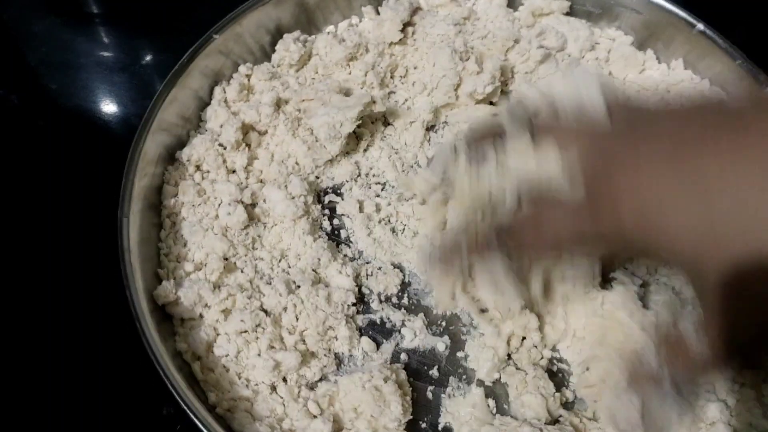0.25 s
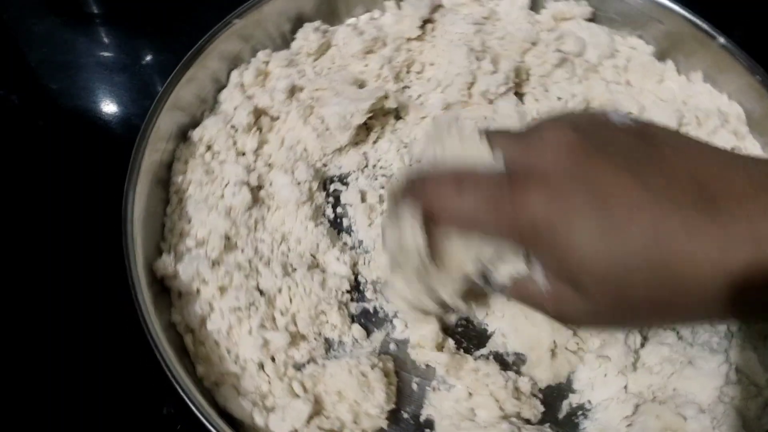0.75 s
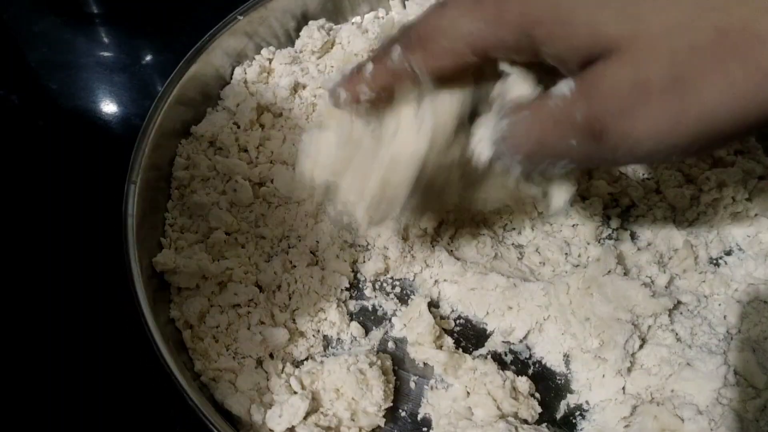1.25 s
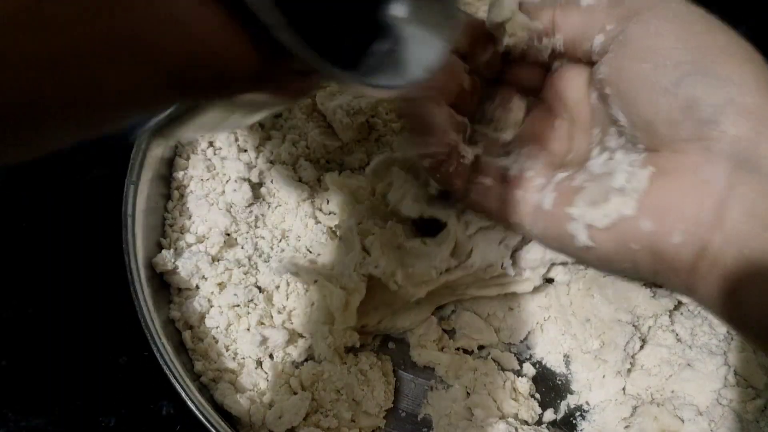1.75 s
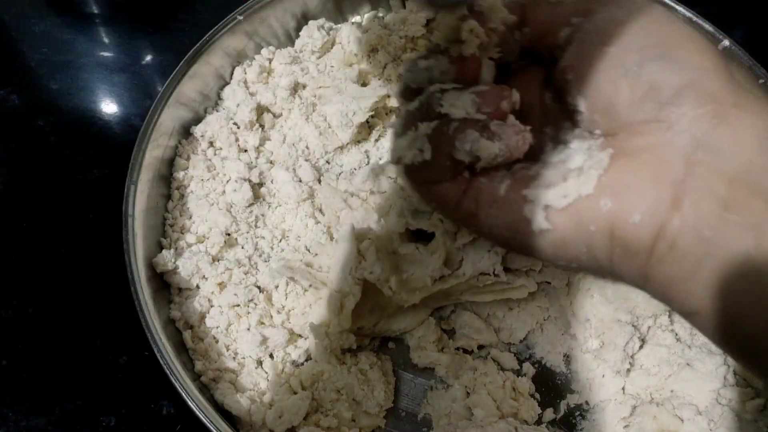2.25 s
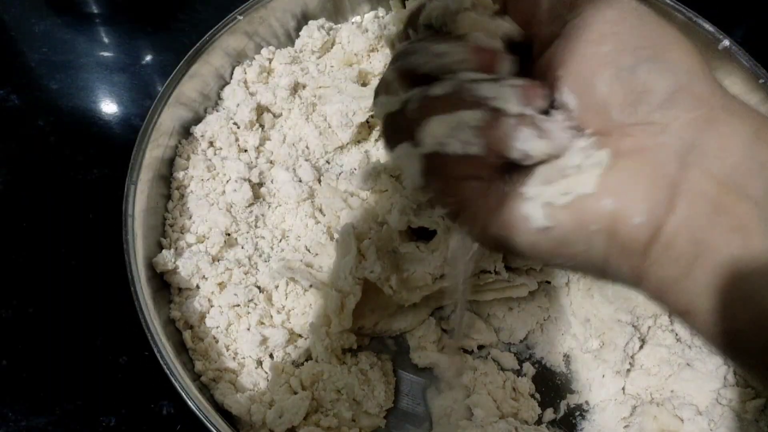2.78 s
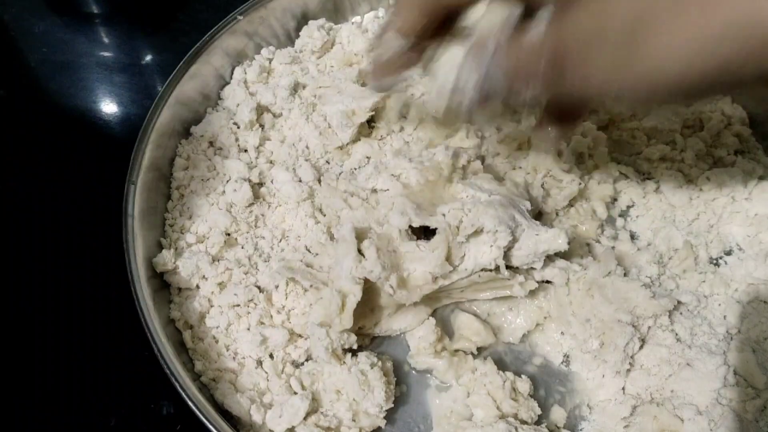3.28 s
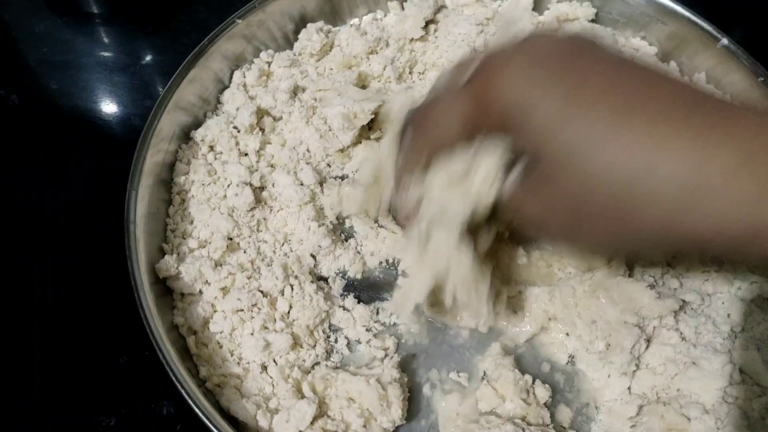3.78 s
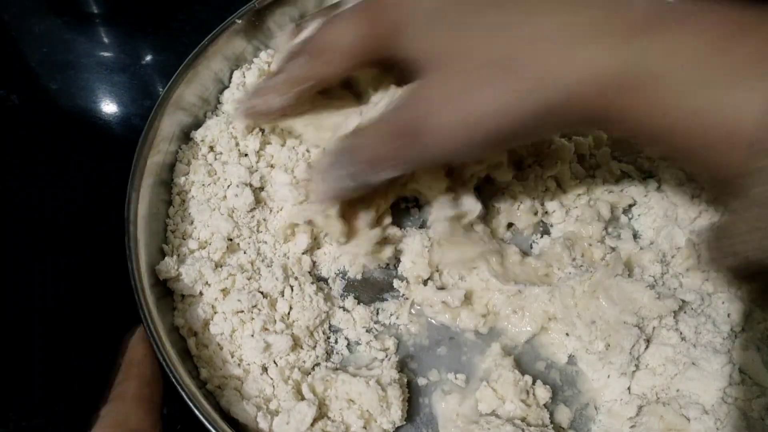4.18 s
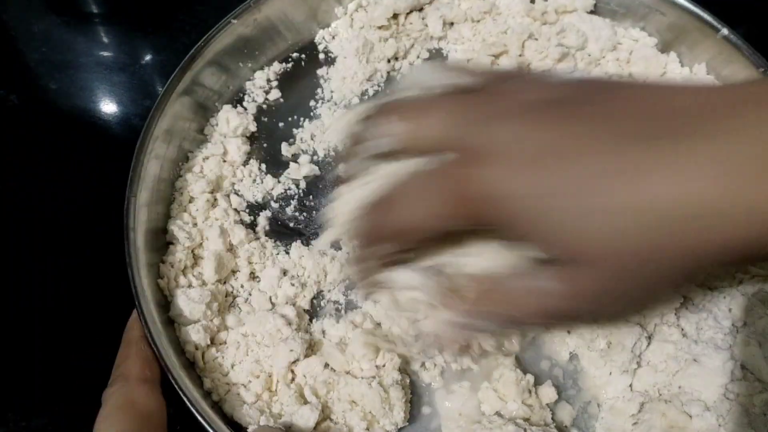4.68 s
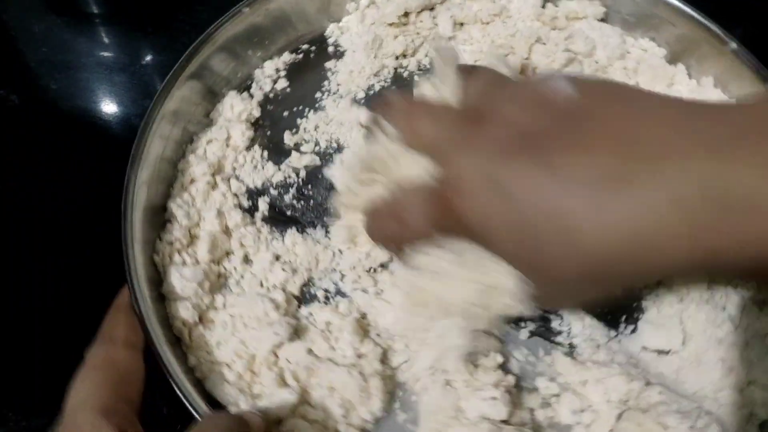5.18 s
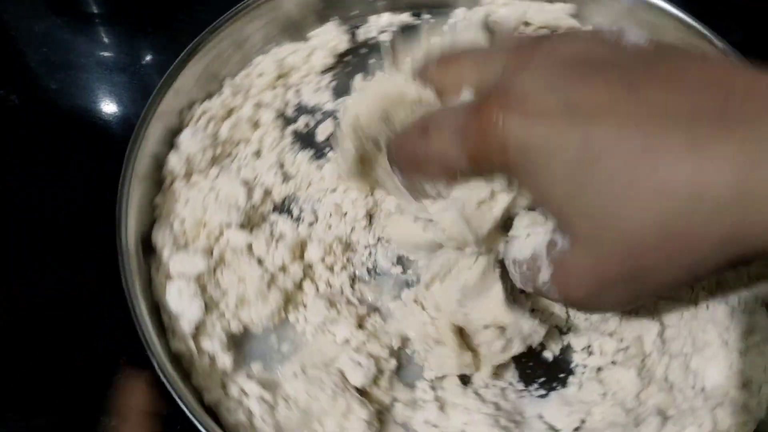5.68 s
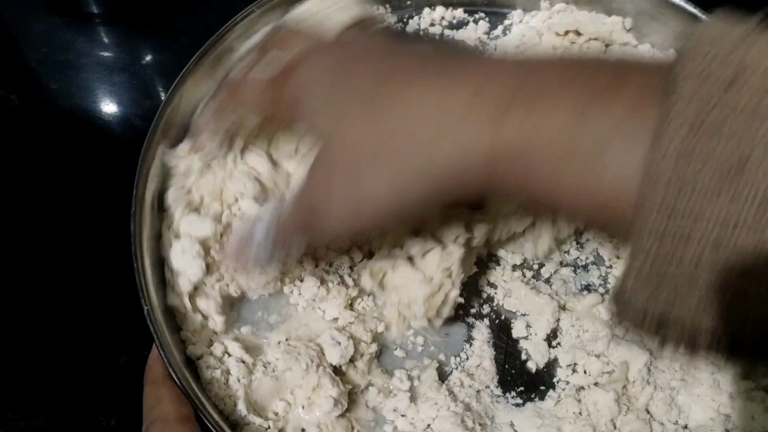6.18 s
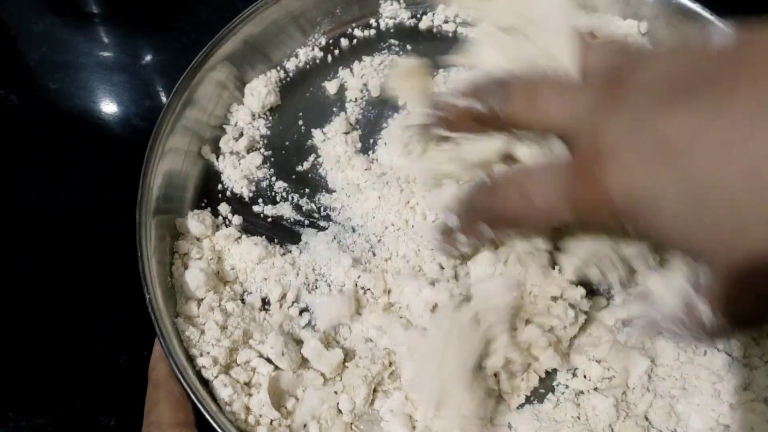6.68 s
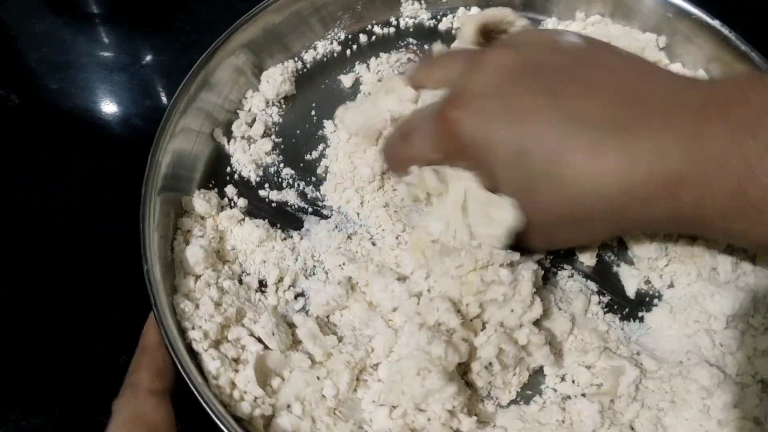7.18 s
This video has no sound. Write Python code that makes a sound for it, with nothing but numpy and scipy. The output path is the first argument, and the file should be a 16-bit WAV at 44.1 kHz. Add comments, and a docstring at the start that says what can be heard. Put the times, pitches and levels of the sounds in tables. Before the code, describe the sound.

Gritty dough kneading with dull metallic knocks, a brief trickle of drops, one loud metal clank, fine clinks, and a short closing squeal.

```python
"""Kneading crumbly dough in a steel plate

A hand kneads on a kitchen counter: crumbs scrape as coloured grain noise, and fingers knock the damped
plate, a bank of decaying modes. Bangles clink as detuned modes; a little water falls as bubbles and splashes.
The steel tumbler is set down hard, its wall and the counter ringing. At the end the turned plate squeals
in stick-slip harmonics. Puffs of air thump the microphone; low room hum, noise and wavering tones, lies beneath."""
import sys
import numpy as np
from scipy import signal
from scipy.fft import rfft, irfft
from scipy.io import wavfile

SR = 44100
rng = np.random.default_rng(int(sys.argv[2]) if len(sys.argv) > 2 else 0)


def generate_wav(signal):
    """Clip the signal to [-1, 1] and save it as 16-bit WAV at the path in sys.argv[1]."""
    frames = np.transpose(np.atleast_2d(signal))
    scaled = np.clip(frames, -1, 1) * 32767
    pcm = np.round(scaled).astype(np.int16)
    wavfile.write(sys.argv[1], SR, pcm)


N = 328104
TIME = np.arange(N) / SR
AGE = TIME[:SR * 3 // 4]  # time since a blow, s

# spectrum of flour grains rubbed or crushed: (frequency [Hz], level [dB])
RUB_COLOUR = [(900, -27.5), (2000, -7), (2800, 0), (3800, -3), (7000, -2), (8300, -6.5), (10000, 0.5),
              (14400, -0.5), (16000, -9)]
# spectrum of the plate rapped or rasped: (frequency [Hz], level [dB])
RAP_COLOUR = [(400, -18), (900, -5.5), (1400, -0.5), (2100, 4), (3000, -2.5), (4200, -15), (8000, -23),
              (16000, -45)]
# stereo width of blows: (frequency [Hz], side minus mid [dB])
BLOW_SIDE = [(100, -14), (250, -10.5), (400, -2.5), (650, 2), (1300, 5), (2400, 0.5), (8000, -1)]


def undb(db):
    """Amplitude ratio: 20 dB is a factor of ten in gain."""
    return np.exp(np.asarray(db) * (np.log(10) / 20))


def unit(x):
    """Normalisation by mean power: scale to rms 1."""
    return x / np.sqrt(np.mean(x ** 2))


def unit_hit(x):
    """Normalisation by onset power: scale a blow so that its first 30 ms have rms 1."""
    return x / np.sqrt(np.mean(x[..., :1323] ** 2))


def pan(db):
    """Interaural level difference: left and right gains for left minus right in dB."""
    return undb(np.array([[.5], [-.5]]) * db)


def fade(t60, count=len(AGE)):
    """Exponential decay: the level falls 60 dB in t60 seconds."""
    return np.exp(-np.log(1000) * AGE[:count] / t60)


def colour(x, points):
    """Minimum-phase filtering: a folded cepstrum gives a causal response through (Hz, dB) points."""
    hz, db = np.transpose(points)
    grid = np.maximum(np.fft.rfftfreq(4096, 1 / SR), 1)
    cepstrum = irfft(np.log(undb(np.interp(np.log(grid), np.log(hz), db))))
    half = len(cepstrum) // 2
    folded = np.r_[cepstrum[0], 2 * cepstrum[1:half], np.zeros(half)]
    response = irfft(np.exp(rfft(folded)))[None, :half]
    filtered = signal.oaconvolve(np.atleast_2d(x).astype("f"), response.astype("f"), axes=1)
    return filtered[:, :x.shape[-1]]


def widen(pair, side):
    """Mid-side stereo: of two unrelated signals one is common, the other opposed between channels."""
    return colour(pair[1], side) * np.array([[1], [-1]]) + pair[0]


def walk(rate, t=TIME):
    """Band-limited fluctuation: straight lines join normal random values drawn at rate per second."""
    return np.interp((t - t[0]) * rate, np.arange(2048), rng.standard_normal(2048))


def grains(per_s, scatter_db, count=N):
    """Shot noise: clicks of uneven size at random times, with independent amplitudes per channel."""
    chance = rng.random(count)
    clicks = np.zeros((2, count))
    at = np.flatnonzero(chance < per_s / SR)
    size = np.minimum(-np.log(chance[at] * SR / per_s), 5)  # exponentially distributed, capped
    clicks[:, at] = undb(scatter_db * size) * rng.standard_normal((2, count), dtype="f")[:, at]
    return clicks


def burst(t60, tail_db, tail_t60, count=8000):
    """Two-stage decay: a crack of noise with a weaker, longer tail."""
    envelope = fade(t60, count) + undb(tail_db) * fade(tail_t60, count)
    return rng.standard_normal((2, count)) * envelope


def ring(modes, contact, detune=0, count=8000):
    """Modal superposition: damped sines of random phase, rising over the contact time in seconds."""
    hz, db, t60 = np.array(modes, "f").T[:, :, None]
    age = AGE[:count].astype("f")
    shift, start = rng.standard_normal((2, len(modes), 1), dtype="f")
    decay = np.exp(-age * float(np.log(1000)) / t60)
    waves = decay * np.sin(2 * np.pi * (hz * (1 + float(detune) * shift) * age + start))
    return (waves * undb(db).astype("f")).sum(axis=0) * (1 - np.exp(-age / contact))


def struck(modes, centre_hz, slope_db):
    """Selective excitation: modes lose slope_db per octave away from the blow's centre frequency."""
    return [(hz, db - slope_db * abs(np.log2(hz / centre_hz)), t60) for hz, db, t60 in modes]


def gesture(s, length, attack_s, release_s):
    """Exponential envelope: gain grows up to time s, holds for a length and dies away."""
    rise = np.minimum((TIME - s) / attack_s, 0)
    fall = np.minimum((s + length - TIME) / release_s, 0)
    return np.exp(np.maximum(rise + fall, -20))


def add(out, s, sound):
    """Linear superposition: mix a sound in at time s."""
    i = max(int(s * SR), 0)
    out[:, i:i + sound.shape[-1]] += sound[..., :N - i]


def room_hum(rumble_db=-53.5, pan_db=1.5):
    """Broadband and tonal background: slowly varying low rumble with a few wavering tones."""
    # rumble spectrum: (frequency [Hz], level [dB])
    rumble_colour = [(20, -15.5), (32, -18.5), (60, 4), (154, -1.5), (262, -14), (345, -12.5), (459, -29.5),
                     (825, -32.5), (1500, -40), (2500, -45), (5500, -51.5), (10000, -48), (15000, -45.5),
                     (16000, -55.5)]
    # rumble width: (frequency [Hz], side minus mid [dB])
    rumble_side = [(60, -18), (110, -14.5), (200, -12.5), (380, -4.5), (700, 5.5), (1290, 2), (2380, -2.5),
                   (4400, -3), (8120, 2), (15000, -2.5)]
    # tones: (mean frequency [Hz], median peak level [dB])
    hum_lines = [(60, -64), (116, -59.5), (148, -57), (345, -74.5)]
    noise = colour(rng.standard_normal((2, N)), rumble_colour)
    rumble = unit(widen(noise, rumble_side)) * undb(rumble_db + walk(3.7))
    tones = np.zeros(N)
    for hz, db in hum_lines:
        turns = np.cumsum(hz + 3.124 * walk(9)) / SR
        tones += undb(db + 2.8 * walk(7)) * np.sin(2 * np.pi * turns)
    return (rumble + tones) * pan(pan_db)


def rubbing(hiss_gain_db=4, attack_s=0.02, release_s=0.029, pan_db=-0.5):
    """Granular friction: flour slips along the steel in small jerks; harder rubbing makes the plate rasp."""
    # finger strokes through the crumbs:
    # (time [s], length [s], hiss level before hiss_gain_db [dB], plate rasp level [dB])
    strokes = [(.01, 0.12, -62, -60), (0.515, 0.11, -69.5, -60), (0.78, 0.3, -76, -76),
               (1.2, 0.16, -76, -83), (1.55, .45, -88, -80.5), (3.067, 0.19, -67.5, -75.5),
               (3.318, .07, -69, -84), (4.46, 0.27, -62.5, -71), (4.666, 0.087, -57.5, -65),
               (4.851, 0.13, -69, -77.5), (5.11, .4, -67.5, -69), (5.238, 0.088, -64.5, -70),
               (5.523, 0.14, -62.5, -62.5), (5.799, 0.043, -64, -94), (6.201, .3, -73, -79.5),
               (6.528, 0.039, -61, -60), (6.793, .06, -70.5, -94), (6.944, 0.2, -61.5, -62.5),
               (7.17, 0.23, -75.5, -78.5)]
    jerks = walk(38)
    hiss = unit(colour(grains(per_s=8700, scatter_db=-1.6), RUB_COLOUR))
    hiss = hiss * undb(2 * jerks + hiss_gain_db)
    rasp = unit(colour(grains(per_s=2900, scatter_db=0.5), RAP_COLOUR))
    rasp = rasp * undb(1.5 * jerks + 2 * walk(70))
    sliding, pressing = np.zeros(N), np.zeros(N)
    for s, length, slide_db, press_db in strokes:
        stroke = gesture(s, length, attack_s, release_s)  # the hand sets in and eases off
        sliding = np.hypot(sliding, stroke * undb(slide_db))  # overlapping strokes add in power
        pressing = np.hypot(pressing, stroke * undb(press_db))
    return (hiss * sliding + rasp * pressing) * pan(pan_db)


def crunch(t60):
    """Brittle fracture: a lump of flour gives way in a decaying noise burst."""
    return unit_hit(colour(burst(t60, tail_db=-14, tail_t60=.12), RUB_COLOUR))


def chatter(count=4, start_s=.78, gap_s=.0395, fall_db=13.5):
    """Repeated impact: the plate rocks back at even gaps, ever more softly."""
    # first knock, before the gains of kneading():
    # (thud level [dB], thud centre [Hz], rap level [dB], crunch level [dB])
    first_knock = (-50.5, 1250, -40.5, -60.5)
    thud_db, thud_hz, rap_db, crunch_db = first_knock
    repeats = []
    for k in range(count):
        fall = fall_db * np.log2(1 + k)  # per doubling of the knock's number; the thud falls half as much
        repeats.append((start_s + k * gap_s, thud_db - fall / 2, thud_hz, rap_db - fall, crunch_db - fall))
    return repeats


def kneading(thud_gain_db=-2, rap_gain_db=-5, crunch_gain_db=-1, lump_gain_db=-5, give_s=0.0022):
    """Plate impact: knocks favour different modes depending on where they land, rap and crush crumbs."""
    # fingers and lumps striking the plate, levels before the gains above:
    # (time [s], thud level [dB], thud centre [Hz], rap level [dB], crunch level [dB])
    knocks = [(.013, -30, 520, -34, -75), (.038, -34.5, 430, -35, -65), (.067, -39, 480, -43.5, -56),
              (.158, -44.5, 700, -37, -58), (.165, -33, 600, -26.5, -31.5), (.178, -37.5, 450, -39.5, -59),
              (.2, -40, 700, -45, -67), (.405, -38.5, 650, -50, -87), (.413, -43.5, 800, -51, -98),
              (.497, -42, 1000, -40.5, -47.5), (0.981, -54.5, 630, -75, -75),
              (4.36, -59, 1200, -53.5, -69.5), (4.484, -49.5, 420, -53, -75), (5.064, -37.5, 356, -43, -39),
              (5.65, -52.5, 280, -65, -63), (6.027, -52.5, 500, -68, -66), (6.052, -42, 280, -65, -74.5),
              (6.079, -47, 1100, -54, -59), (6.254, -48.5, 330, -62, -80), (6.937, -39, 380, -47.5, -51),
              (6.952, -38.5, 330, -39.5, -37.5), (6.974, -47, 260, -47.5, -64), (7.007, -46, 280, -45, -46)]
    # dry lumps bursting under the fingers: (time [s], level before lump_gain_db [dB])
    lumps = [(.519, -41), (.533, -39), (.54, -41), (.562, -40), (.578, -44.5), (.59, -45.5), (3.066, -52.5),
             (3.074, -53), (3.139, -49), (4.454, -59), (5.527, -52), (5.612, -50), (6.015, -59.5),
             (6.527, -52), (6.778, -45.5)]
    # plate modes, damped by dough: (nominal frequency [Hz], relative level [dB], t60 [s])
    plate_modes = [(222, -9, .13), (263.5, 3.5, 0.19), (296, -3, 0.26), (376.2, -1, 0.11),
                   (461.5, -0.5, 0.056), (539, -1.5, 0.058), (688, -2.5, 0.057), (775, -9, 0.16),
                   (868, -5, 0.074), (1025, -5, 0.037), (1301, -0.5, 0.056), (1425, -5.5, 0.095)]
    out = np.zeros((2, N))
    for s, thud_db, thud_hz, rap_db, crunch_db in knocks + chatter():
        modes = struck(plate_modes, thud_hz, slope_db=16)
        pair = [ring(modes, contact=0.0016, detune=.03) for _ in range(2)]
        thud = unit_hit(widen(pair, BLOW_SIDE))
        rap = unit_hit(colour(burst(t60=0.025, tail_db=-13, tail_t60=0.15), RAP_COLOUR))
        knock = thud * undb(thud_db + thud_gain_db) + rap * undb(rap_db + rap_gain_db)
        knock += crunch(t60=0.017) * undb(crunch_db + crunch_gain_db)
        cushion = np.minimum(AGE[:knock.shape[1]] / give_s, 1)  # the dough softens the first contact
        add(out, s, knock * cushion * pan(1))
    for s, db in lumps:
        add(out, s, crunch(t60=0.04) * undb(db + lump_gain_db) * pan(1.4))
    return out


def thumps(gain_db=2.5):
    """Frequency modulation: slow, uneven low swings swell smoothly as puffs of air thump the microphone."""
    # soft low thumps:
    # (time [s], length [s], mean frequency [Hz], level before gain_db [dB], left minus right [dB])
    soft_thumps = [(.17, 0.12, 130.3, -42.5, 3), (0.498, 0.11, 80.2, -38, 3),
                   (5.715, 0.066, 63.6, -37, 26.5), (6.096, 0.095, 82, -41.5, 3),
                   (6.961, 0.054, 223, -39, 6)]
    out = np.zeros((2, N))
    for s, length, hz, db, pan_db in soft_thumps:
        n = int(length * SR)
        turns = np.cumsum(hz * (1 + 0.3 * walk(61.3)[:n])) / SR
        swing = np.sin(2 * np.pi * turns) * np.hanning(n) ** .5
        add(out, s, swing * undb(db + gain_db) * pan(pan_db))
    return out


def tumbler(lag_s=0.00034, ring_pan_db=-6, counter_pan_db=5, clack_pan_db=-1, choke_db=-2):
    """Coupled impact: steel meets the counter in a clack, the wall's ring and the boom of the top beneath."""
    # the tumbler is picked up; later it lands, rocks and settles:
    # (time [s], ring level [dB], ring centre [Hz], counter level [dB], clack level [dB], contact time [s])
    landings = [(1.02, -59.5, 4540, -63.5, -58.5, 0.0078), (3.558, -18, 2088, -24, -18.5, .0013),
                (3.614, -36.5, 2600, -40, -28, 0.0013), (3.641, -29.5, 2300, -38, -34.5, 0.0037),
                (3.795, -43, 2600, -34, -45.5, 0.0036), (3.81, -30, 2960, -32, -28, 0.0032),
                (3.826, -40, 3370, -40, -26.5, 0.0022)]
    # steel wall modes: (frequency [Hz], relative level [dB], t60 [s])
    wall_modes = [(1586, -17, .3), (2160, 4, 0.22), (2190, -7.5, 0.17), (2621, -6, 0.37), (2821, -10, 0.15),
                  (2990, -18, 0.26), (3050, -20, 0.37), (3520, -24, 0.51), (3820, -14, .2),
                  (4720, -20.5, 0.19), (4690, -10, .22), (5390, -24, .3), (5600, -6.5, 0.11),
                  (6810, -14, .25), (9600, -20, 0.17)]
    # modes of the counter and the ware on it: (nominal frequency [Hz], relative level [dB], t60 [s])
    counter_modes = [(77, -15.5, 0.76), (150, -17.5, 0.439), (262, -8.5, .35), (306.5, 0, 0.41),
                     (346, -2.5, 0.37), (382.8, 0.5, 0.29), (525.7, -10.5, 0.27), (562, -1.5, 0.47),
                     (622, 1, 0.7), (635, -4.5, 0.41), (709, -10.5, .45), (799, -6.5, 0.45),
                     (870, -17, .32), (950, -10, 0.12), (1064, -5.5, 0.15), (1208, -9, 0.205)]
    # clack spectrum: (frequency [Hz], level [dB])
    clack_colour = [(100, -20), (200, -6), (300, -2.5), (600, 2), (1000, -3.5), (1450, -15), (2100, -6),
                    (3100, -3.5), (4200, -21.5), (4700, -16.5), (5700, -18.5), (6400, -22), (8500, -21.5),
                    (15000, -27.5)]
    steel, blows, count = np.zeros((2, N)), np.zeros((2, N)), len(AGE)
    for s, ring_db, ring_hz, counter_db, clack_db, contact in landings:
        steel *= undb(choke_db * np.clip((TIME - s) / .004, 0, 1))  # each new contact damps what still rings
        wall = unit_hit(ring(struck(wall_modes, ring_hz, slope_db=6.5), contact / 2, count=count))
        wall = np.array([np.interp(AGE - lag_s, AGE, wall), wall])  # it stands nearer the right microphone
        add(steel, s, wall * undb(ring_db) * pan(ring_pan_db))
        pair = [ring(counter_modes, contact, detune=0.0204, count=count) for _ in range(2)]
        boom = unit_hit(widen(pair, BLOW_SIDE))
        crack = burst(t60=22 * contact, tail_db=-17, tail_t60=0.49, count=count)
        clack = unit_hit(widen(colour(crack, clack_colour), BLOW_SIDE))
        onset = 1 - np.exp(-AGE / (0.23 * contact))
        blow = boom * undb(counter_db) * pan(counter_pan_db) + clack * undb(clack_db) * pan(clack_pan_db)
        add(blows, s, blow * onset)
    return steel + blows


def bubble(hz, cycles=40, glide=6, count=3000):
    """Bubble resonance: trapped air swings up within two cycles, rings briefly and rises in pitch."""
    age = AGE[:count]
    turns = hz * age * (1 + glide * age / 2) + rng.random((2, 1)) / 2
    return np.sin(2 * np.pi * turns) * fade(cycles / hz, count) * np.minimum(age * hz / 2, 1)


def water(pour_db=-66, splash_db=-9, fizz_db=-61, count=70):
    """Entrained air: the thin stream fizzes with tiny bubbles; each drop splashes and traps a larger one."""
    # spectrum of the stream: (frequency [Hz], level [dB])
    pour_colour = [(1500, -24), (2300, -10), (3000, 9), (4200, -4), (5100, 10.5), (7000, 7.5), (8500, -2.5),
                   (15000, -23.5)]
    # drops falling in the dough: (time [s], bubble level [dB], starting bubble frequency [Hz])
    drops = [(2.6778, -40, 3000), (2.6947, -44.5, 3000), (2.7896, -33.5, 6300), (2.802, -45.5, 2980),
             (2.849, -43, 3100), (2.8809, -41.5, 2940), (2.9995, -34, 3080), (3.0157, -42.5, 2560),
             (3.0377, -34.5, 5100), (3.0719, -26, 2797), (3.141, -45, 3000), (3.2251, -35.5, 3310)]
    stream = unit(colour(grains(per_s=1100, scatter_db=-1), pour_colour))
    out = stream * gesture(s=2.57, length=.28, attack_s=0.03, release_s=.07) * undb(pour_db)
    for s, drop_db, hz in drops:
        # the dent in the dough colours the splash
        hollow = [(hz / 3, -30), (hz / 2, -6), (hz, 2), (hz * 2.4, -7), (hz * 4, -24)]
        splash = colour(burst(t60=0.025, tail_db=-24, tail_t60=0.052, count=3000), hollow)
        add(out, s, undb(drop_db) * (bubble(hz) + undb(splash_db) * splash))
    for when, pitch, size in rng.random((count, 3)):
        add(out, 2.62 + 0.23 * when, bubble(2600 * 3 ** pitch) * undb(fizz_db + 14.4 * size))
    return out


def narrow_hiss(level_db=-65.5):
    """Band-limited noise: a faint hiss near 3.8 kHz swells and dies away after the pour."""
    band_colour = [(2800, -32.5), (3500, -7.5), (3850, 4), (4100, -17.5), (4500, -47)]  # (Hz, dB)
    band = unit(colour(rng.standard_normal((2, N)), band_colour))
    return band * gesture(s=3.27, length=.3, attack_s=0.29, release_s=.55) * undb(level_db)


def bangles(gain_db=-3.5, rattle_db=-6, rattle_s=.007):
    """Modal ringing of thin rings: they touch twice in quick succession, slightly detuned in each channel."""
    # bangles touching: (time [s], level before gain_db [dB], left minus right [dB])
    clinks = [(4.162, -37.5, -1.5), (4.335, -45, 2.5), (4.474, -53, 2), (4.778, -47, -1),
              (6.089, -33.5, -3), (6.352, -53.5, -1), (7.149, -44.5, 0)]
    # bangle modes: (nominal frequency [Hz], relative level [dB], t60 [s])
    bangle_modes = [(4010, -16, 0.2), (4257, -9, 0.12), (7820, -9, 0.3), (7990, 4.5, 0.068),
                    (12520, 10, 0.06), (13130, 11.5, 0.06), (12400, 2.5, 0.022), (14850, -5, 0.11)]
    out = np.zeros((2, N))
    for s, db, pan_db in clinks:
        for delay, touch_db in [(0, 0), (rattle_s, rattle_db)]:
            pair = [ring(bangle_modes, contact=0.00023, detune=0.0039) for _ in range(2)]
            chime = unit_hit(np.array(pair))
            add(out, s + delay, chime * undb(db + touch_db + gain_db) * pan(pan_db))
    return out


def squeal(start_s=7.05, attack_s=.015, tone_db=-51, jitter=0.0053, flutter_db=3.5, rough_db=-6):
    """Stick-slip friction: the turning plate's base grips and slips; partials near bright modes stand out."""
    # partials: (multiple of the slip rate [1], relative level [dB])
    partials = [(1, -3), (2, -20.5), (3, -28), (6, -19.5), (7, -11.5), (8, -5), (9, 7), (10, -10.5),
                (11, -20)]
    # pushes of the hand that swell the squeal: (time [s], length [s], added level [dB])
    pushes = [(7.056, .03, 3), (7.158, 0.063, 6), (7.269, 0.035, 5.5), (7.408, .09, 6)]
    slip_start_hz, slip_end_hz, slip_rise_s = 341.4, 351, .1  # the rate climbs as the turn gets going
    first = int((start_s - .1) * SR)
    t, out = TIME[first:], np.zeros((2, N))
    climb = np.exp(-np.maximum(t - start_s, 0) / slip_rise_s)
    hz = slip_end_hz + (slip_start_hz - slip_end_hz) * climb
    turns = np.cumsum(hz * (1 + jitter * walk(100, t))) / SR
    tone = np.zeros((2, len(t)))
    for k, part_db in partials:
        wave = np.sin(2 * np.pi * (round(k) * turns + rng.random((2, 1)) / 3))
        tone += undb(part_db + flutter_db * walk(35, t)) * wave
    grind_colour = [(1200, -37), (2400, -17), (2770, -8.5), (2930, -7), (3110, 5.5), (3300, -9.5),
                    (4500, -26), (9000, -38)]  # (Hz, dB)
    grind = colour(grains(per_s=3700, scatter_db=2, count=len(t)), grind_colour)
    grip_db = 1.5 * walk(70, t)
    push_db = sum(db * np.exp(-(2 * (t - s) / length) ** 2) for s, length, db in pushes)
    onset = np.exp(np.minimum(t - start_s, 0) / attack_s)
    rough_tone = unit(tone) + undb(rough_db) * unit(grind)
    add(out, t[0], rough_tone * onset * undb(tone_db + push_db + grip_db) * pan(3.2))
    return out


def kitchen(x, wet_db=-13, low_t60=0.53, high_t60=.35):
    """Diffuse reverberation: hard walls return a short noise tail that dulls as it fades."""
    low_colour = [(100, -15), (400, -4), (2500, -8), (6000, -18.5)]  # (Hz, dB)
    high_colour = [(1500, -16.5), (5000, -3), (15000, -13)]  # (Hz, dB)
    low = colour(rng.standard_normal((2, len(AGE))), low_colour) * fade(low_t60)
    high = colour(rng.standard_normal((2, len(AGE))), high_colour) * fade(high_t60)
    tail = unit((low + high) * (1 - np.exp(-AGE / 0.001))) / np.sqrt(len(AGE))  # unit energy
    echo = signal.fftconvolve(x.astype("f"), tail.astype("f"), axes=1)[:, :N]
    return x + undb(wet_db) * echo


def scene():
    """Superposition: all sounds but the thumps and the hum share the kitchen's short tail."""
    hand = rubbing() + kneading() + bangles()
    ware = water() + narrow_hiss() + squeal() + tumbler()
    return kitchen(hand + ware) + thumps() + room_hum()


def record(dry, ceiling=.9, top_hz=15700):
    """Saturation and band limit: a nearby phone rounds the loudest peaks and cuts the top."""
    rounded = ceiling * np.tanh(dry / ceiling)
    low_pass = signal.ellip(8, .2, 70, top_hz, fs=SR, output="sos")  # order, ripple dB, stopband dB
    return signal.sosfilt(low_pass, rounded)


dry = scene()
out = record(dry)
generate_wav(out)
```